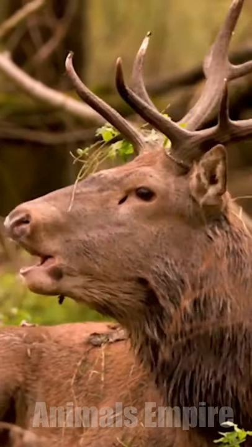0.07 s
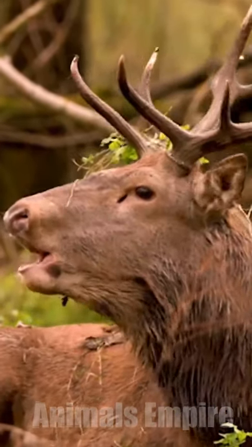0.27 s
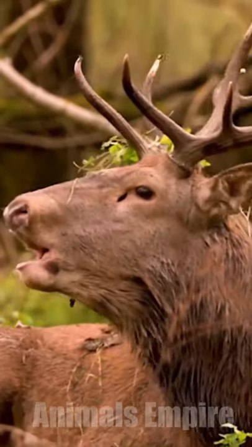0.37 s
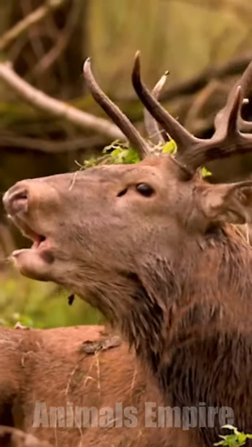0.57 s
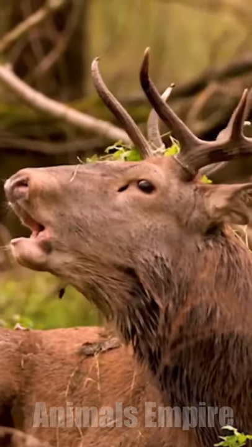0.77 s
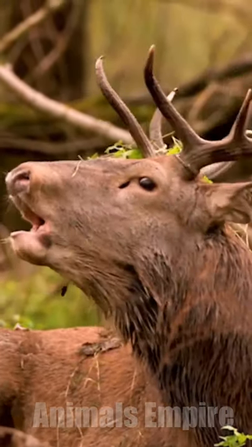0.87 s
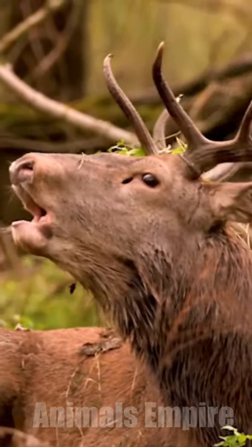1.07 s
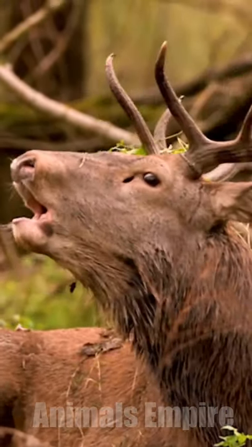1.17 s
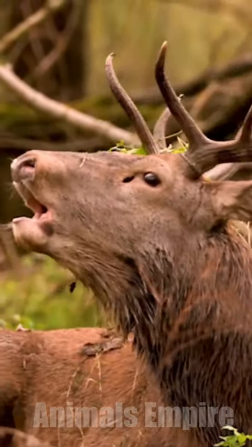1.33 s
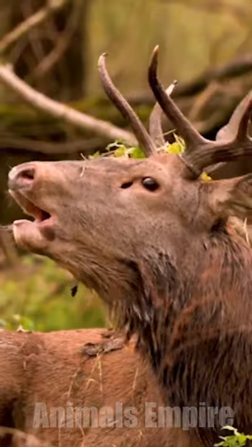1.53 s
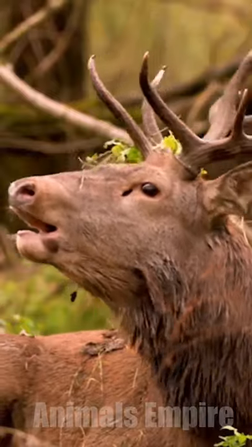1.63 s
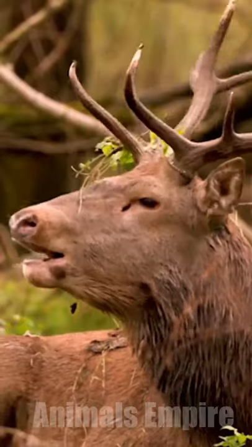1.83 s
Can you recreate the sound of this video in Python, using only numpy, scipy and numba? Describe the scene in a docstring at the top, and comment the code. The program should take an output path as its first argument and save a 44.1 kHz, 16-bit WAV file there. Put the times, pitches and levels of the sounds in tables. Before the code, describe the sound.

One deep stag roar, starting clear, then rattling and sinking, over faint outdoor noise.

```python
"""One long roar from a red deer stag fills a quiet woodland.
It starts as a clear note: the vocal folds snap shut in a steady beat and make the throat ring, and
the ringing sinks as the throat lengthens. The beat turns uneven and the note breaks into a harsh rattle,
then drops in pitch and dies away with a small grunt. The trees return a faint tail."""
import sys
import numpy as np
from scipy import signal
from scipy.fft import rfft, irfft
from scipy.io import wavfile
from scipy.ndimage import uniform_filter1d
from numba import njit

SR = 44100
rng = np.random.default_rng(int(sys.argv[2]) if len(sys.argv) > 2 else 0)


def generate_wav(sig):
    """Save sig (samples, or channels by samples) to the path in sys.argv[1] as 16-bit PCM at SR."""
    pcm = np.round(np.clip(np.atleast_2d(sig).T, -1, 1) * 32767).astype(np.int16)
    wavfile.write(sys.argv[1], SR, pcm)


N = 83790
T = np.arange(N) / SR
ROAR_START_S = 0.146

# How the ringing sinks as the throat lengthens. Each row: time in seconds, factor on its frequencies.
THROAT_SHIFT = [(.15,1.38),(.23,1.26),(.32,1.14),(.44,1.095),(.52,1.035),(.58,1.0),(.7,1.0)]
# Loudness of the voice. Each row: time in seconds, then middle, upper and treble level in relative dB.
VOICE_LEVELS = [(0.13, -55, -50, -67), (0.184, -36, -34, -69), (0.218, -27.5, -29, -66),
                (0.298, -29.5, -22, -59), (0.344, -22, -26.5, -62), (0.456, -26, -17.5, -47),
                (0.532, -19, -16.5, -36), (0.56, -21.5, -21.5, -32.5), (0.59, -20.5, -17, -30),
                (0.704, -22, -23, -39), (1.154, -21.5, -25.5, -40), (1.192, -22, -39, -44),
                (1.208, -19.5, -24.5, -39.5), (1.246, -20, -26.5, -44), (1.34, -24.5, -29.5, -38.5),
                (1.404, -17.5, -28, -38), (1.438, -24, -27, -41), (1.552, -30, -37, -54),
                (1.606, -28.5, -38.5, -57), (1.65, -56, -44, -54)]


def from_db(db):
    """Turn decibels into a factor to multiply by."""
    return 10 ** (np.asarray(db) / 20)


def in_time(rows):
    """Join rows that start with a time by straight lines, giving one curve per further column."""
    times, *columns = np.transpose(rows)
    return [np.interp(T, times, column) for column in columns]


def gate(start_s, end_s, fade_s=0.016):
    """Let sound through between two times, with short fades outside them."""
    return np.clip(1 + np.minimum(T - start_s, end_s - T) / fade_s, 0, 1)


def even(x, size=1500):
    """Hold the level near 1, averaging over stretches of `size` samples."""
    power = uniform_filter1d(uniform_filter1d(x * x, size), size)
    return x / np.sqrt(np.abs(power) + 1e-12)


def band(x, low_hz, high_hz, order=3):
    """Keep the sound between two frequencies."""
    return signal.sosfilt(signal.butter(order, [low_hz, high_hz], "band", fs=SR, output="sos"), x)


def wander(rate_hz):
    """A smooth random wobble with a typical size of 1."""
    x = signal.sosfilt(signal.butter(2, rate_hz, fs=SR, output="sos"), rng.standard_normal(N))
    return x / x.std()


@njit
def resonate(x, pole):
    """One resonance, a tone that rings on; `pole` sets its pitch and decay at each sample."""
    out, state = np.zeros(len(x)), 0j
    for i in range(len(x)):
        state = state * pole[i] + x[i]
        out[i] = state.real
    return out


def airway(x, resonances, shift=0.97):
    """The airway rings at several resonances at once, each at its base frequency times `shift`."""
    out = 0
    for hz, width_hz, db in resonances:
        decay = np.exp(-np.pi * abs(width_hz) / SR)
        pole = decay * np.exp(2j * np.pi * hz * shift / SR) * np.ones(N)
        out = out + from_db(db) * (1 - decay) * resonate(x, pole)
    return out


def clear_to_harsh(clear, harsh, middle_s=0.7045, length_s=0.04075):
    """The voice breaks: a quick fade from its clear sound to its harsh one."""
    broken = np.clip((T - middle_s) / length_s + .5, 0, 1)
    return np.sqrt(1 - broken) * even(clear) + np.sqrt(broken) * even(harsh)


def background():
    """Faint, steady outdoor noise."""
    # The tone of the woodland air. Each row: frequency in Hz, relative level in dB.
    spectrum = [(25,-15),(60,-11),(150,-7.5),(400,-8),(1000,-7),(1700,-16),(3000,-22.5),(7000,-30.5),(14000,-34.5)]
    hz, db = np.transpose(spectrum)
    all_hz = np.arange(N // 2 + 1) * SR / N
    colour = from_db(np.interp(np.log(all_hz + 1), np.log(hz), db))
    noise = irfft(rfft(rng.standard_normal(N)) * colour, N)
    return from_db(-44.5) * noise / noise.std()


def tree_echoes(x, level_db=-17, die_away_s=.9):
    """The trunks scatter the sound back as a dull, fading tail."""
    tail = band(rng.standard_normal(N), 570, 2000, order=1)
    tail *= from_db(-60 * T / die_away_s) * np.minimum(T / 0.0077, 1)
    return from_db(level_db) * signal.fftconvolve(x, tail / np.sqrt(np.sum(tail ** 2)))[:N]


def grunts():
    """Soft puffs of breath pass through the slack throat before and after the roar."""
    # The puffs. Each row: time of the peak in seconds, half length in seconds, level in dB.
    puffs = [(0.024,0.014,-38.5),(1.702,0.019,-37),(1.838,0.091,-52)]
    # Throat resonances. Each row: base frequency in Hz, width in Hz, relative level in dB.
    slack_throat = [(201,30,6.5),(530,124,-7),(876,15,-1.5),(1008,40,-28),(1410,78,-27)]
    level = sum(from_db(db) * np.exp(-((T - s) / half_s) ** 2) for s, half_s, db in puffs)
    breath = airway(rng.standard_normal(N), slack_throat)
    return level * even(band(breath, 150, 2400, order=2))


def wheeze(peak_s=0.37, half_length_s=0.11, peak_db=-47):
    """A thin, breathy whistle sinks as the throat lengthens."""
    # Its resonance. The row: base frequency in Hz, width in Hz, relative level in dB.
    whistle = [(4270,230,0)]
    level = from_db(peak_db) * np.exp(-((T - peak_s) / half_length_s) ** 2)
    return level * even(airway(rng.standard_normal(N), whistle, in_time(THROAT_SHIFT)[0]))


def snaps(decay_s=.0028, boost_db=6.5):
    """The hardest closures of the vocal folds make high cracks."""
    # Each row: start in seconds, relative level in dB.
    closures = [(0.7516, -31.5), (0.925, -30), (1.1204, -28), (1.1675, -31), (1.2984, -32.5), (1.3154, -32),
                (1.3331, -33), (1.3505, -33), (1.3682, -31)]
    level = sum(from_db(db + boost_db) * (T >= s) * np.exp(-np.abs(T - s) / decay_s)
                for s, db in closures)
    crack = level * rng.standard_normal(N)
    return band(crack, 5200, 8000, order=2) + from_db(-16) * band(crack, 7800, 14000)


def last_beats():
    """The folds slacken and end the roar with a few slow, separate thuds."""
    # The closures. Each row: time in seconds, level in dB.
    closures = [(1.604,-25),(1.617,-19),(1.63,-18.5)]
    # What they ring with. Each row: base frequency in Hz, width in Hz, relative level in dB.
    slack_ring = [(221,50,-1.5),(308.8,75.5,-10.5)]
    clicks = np.zeros(N)
    for s, db in closures:
        clicks[int(s * SR)] = from_db(db)
    thuds = band(airway(clicks, slack_ring), 130, 420, order=2)
    return thuds * clicks.max() / np.abs(thuds).max()


def fold_clicks(cycles, roughness, spread_db, spread_s=0.000434):
    """The folds click shut once a cycle; strength and timing stray by the spreads times roughness."""
    times = np.interp(np.arange(1, int(cycles[-1])), cycles, T)
    chance = rng.standard_normal((len(times), 2)) * np.interp(times, T, roughness)[:, None]
    position = np.clip((times + spread_s * chance[:, 0]) * SR, 0, N - 2)
    strength = from_db(spread_db * np.clip(chance[:, 1], -2, 2))
    sample, fraction = position.astype(int), position % 1
    clicks = np.zeros(N)
    np.add.at(clicks, sample, strength * (1 - fraction))  # two neighbouring samples share each click
    np.add.at(clicks, sample + 1, strength * fraction)
    return clicks


def with_air(clicks, air_share, puff_s):
    """Each closure lets through a short puff of rushing air."""
    puff_level = signal.lfilter([1], [1, -np.exp(-1 / (puff_s * SR))], clicks + 1e-18)
    return even(clicks) + air_share * even(puff_level * rng.standard_normal(N))


def growl(pitch_hz):
    """Uneven beats stray around the pitch and ring low in the chest."""
    # Loudness of the growl. Each row: time in seconds, level in dB.
    levels = [(.1,-58),(.17,-38),(.25,-57),(.65,-47),(.68,-31),(.76,-23.5),(.81,-16.5),(.92,-21.5),(.99,-17),(1.05,-21.5),(1.11,-17),(1.2,-23.5),(1.27,-20.5),(1.31,-37),(1.55,-52),(1.63,-48),(1.67,-55)]
    # Chest resonances. Each row: base frequency in Hz, width in Hz, relative level in dB.
    chest = [(178,26,-6),(226.3,47,15.5),(325,210,5)]
    cycles = np.cumsum(pitch_hz * np.clip(1 + .2 * wander(40.3), .3, 2)) / SR
    clicks = fold_clicks(cycles, np.ones(N), spread_db=3.5, spread_s=.0016)
    beats = with_air(clicks, air_share=0.69, puff_s=0.0063)
    rumble = band(airway(beats, chest), 139.7, 379, order=5)
    return from_db(in_time(levels)[0]) * even(rumble, size=900)


def mouth_echoes(x, decay_s=.004):
    """Short reflections in the mouth smear each pulse but keep the pitch."""
    return even(signal.fftconvolve(x, rng.standard_normal(N) * np.exp(-T / decay_s))[:N])


def rasp(cycles, roughness):
    """Airy pulses from the folds give the voice its high, hissing edge."""
    # High resonances of the lengthening throat and of the fully stretched one.
    # Each row: base frequency in Hz, width in Hz, relative level in dB.
    sinking = [(4340,200,-3),(5980,130,7),(6940,170,4.5),(7800,260,-4)]
    stretched = [(3810,660,6.5),(5550,67,9),(6400,3200,-6.5),(8130,680,-5)]
    clicks = fold_clicks(cycles, roughness, spread_db=5)
    hiss = with_air(clicks, air_share=.3 + 3 * roughness, puff_s=.007)
    clear = band(airway(mouth_echoes(hiss), sinking, in_time(THROAT_SHIFT)[0]), 3000, 9200)
    harsh = band(airway(hiss, stretched), 3830, 8640)
    sizzle = from_db(-17.5) * np.sqrt(roughness) * even(band(mouth_echoes(hiss), 9000, 19000))
    _, _, treble_db = in_time(VOICE_LEVELS)
    return from_db(treble_db - 2) * (clear_to_harsh(clear, harsh) + sizzle)


def throat_ring(cycles, roughness):
    """Pulses from the folds ring in the throat, mouth and nose, giving the roar its vowel."""
    # Resonances: mouth, nose and lengthening throat (clear voice), stretched throat (harsh voice),
    # and a low one under both. Each row: base frequency in Hz, width in Hz, relative level in dB.
    mouth = [(998,62,-1.5),(1152.5,30,0)]
    nose = [(3135,68,-7),(1405,67,-13)]
    sinking = [(1357.6,57,5.5),(2000,84,-4),(2664,63,-3),(3120,67,-12.5)]
    stretched = [(889.7,20.5,1.5),(1027,41.3,1),(1120,58,-16.5),(1387,21,3.5),(1468,36,6),(1838,38,-4),(2027,64,-2.5),(2317.5,22,0.5),(2379.5,37,-15),(2994,29,-6.5),(3254,73,-4.5)]
    low_ring = [(481,37,0)]
    # Loudness of the low ring. Each row: time in seconds, level in dB.
    low_levels = [(.15,-59),(.4,-65),(.65,-36),(.8,-27),(1.2,-31),(1.35,-34),(1.5,-37.5),(1.65,-51)]
    clicks = fold_clicks(cycles, roughness, spread_db=4.5)
    pulses = with_air(clicks, air_share=.06 + .55 * roughness, puff_s=.0025)
    shift = in_time(THROAT_SHIFT)[0]
    # The mouth opens around 0.2 seconds and lets out the higher resonances.
    opening = from_db(-11 * np.clip(.5 - (T - .2) / .1, 0, 1))
    higher = airway(pulses, sinking[1:], shift) + airway(pulses, nose)
    clear = airway(pulses, sinking[:1], shift) + opening * higher
    harsh = airway(pulses, stretched)
    low = even(band(airway(pulses, low_ring), 509.4, 659))
    middle = clear_to_harsh(band(airway(pulses, mouth), 677, 1150), band(harsh, 857, 1130))
    upper = clear_to_harsh(band(clear, 1247, 2860), band(harsh, 1297, 3034, order=4))
    low_db = in_time(low_levels)[0]
    middle_db, upper_db, _ = in_time(VOICE_LEVELS)
    return from_db(low_db) * low + from_db(middle_db - 2) * middle + from_db(upper_db + 0.5) * upper


def harmonics(cycles, levels_db):
    """The beating folds make a deep note: pure tones at 1, 2, 3 and 4 times the pitch."""
    # One value per tone: the dB added to its level.
    trim_db = [0.0, 0.0, 0.0, -1.0]
    # In-between tones, heard while every second beat is stronger.
    # Each row: multiple of half the pitch, level in dB.
    half_tones = [(3,-32),(5,-24)]
    note = sum(from_db(db + trim_db[k]) * np.cos(2 * np.pi * (k + 1) * cycles)
               for k, db in enumerate(levels_db))
    halves = sum(from_db(db) * np.cos(np.pi * multiple * cycles) for multiple, db in half_tones)
    return np.sqrt(2) * (note * gate(ROAR_START_S, 1.595) + halves * gate(1.285, 1.425))


def roar():
    """The stag's vocal folds beat at a gliding pitch, which wobbles more as they turn rough."""
    # The clear start, harsh middle and falling end of the call.
    # Each row: time in seconds, pitch in Hz, then the levels of harmonics 1 to 4 in relative dB.
    clear_part = [(0.15, 108.3, -60, -62, -68, -48), (0.178, 124.7, -47, -36.5, -44, -39),
                  (0.202, 138.7, -42, -40, -32, -69), (0.23, 148.7, -40, -31, -33.5, -48),
                  (0.246, 153, -38, -38.5, -34.5, -62), (0.286, 152.8, -35.5, -28, -38, -51),
                  (0.364, 156.1, -31.5, -25.5, -34, -47), (0.402, 153.6, -32, -21.5, -36, -59.5),
                  (0.468, 148.1, -30, -22.5, -32, -29), (0.534, 140, -32.5, -20.5, -29.5, -37.5),
                  (0.608, 138.4, -34.5, -20, -19, -44), (0.66, 138.6, -31.5, -17.5, -22.5, -36)]
    harsh_part = [(0.69, 150.8, -28, -19, -24, -45), (0.7, 150.2, -23.5, -18.5, -18, -44),
                  (0.78, 162, -21.5, -16.5, -24, -38), (0.796, 166.4, -19, -26, -18.5, -37),
                  (0.852, 152.5, -25.5, -21, -22, -41), (0.954, 159.3, -25.5, -14, -18.5, -37),
                  (0.982, 155.2, -27, -19, -20.5, -48), (1.052, 145.1, -25.5, -19.5, -27, -43),
                  (1.108, 157.5, -22.5, -19.5, -31, -48), (1.14, 142.7, -25.5, -18.5, -25.5, -49),
                  (1.238, 131.1, -26, -20.5, -36.5, -35), (1.26, 127.2, -26.5, -29, -31.5, -31)]
    falling_part = [(1.295, 117.0, -29.5, -25, -18, -27), (1.421, 111.3, -34, -36, -18, -30),
                    (1.459, 108.9, -37, -24.5, -15.5, -31), (1.501, 107.8, -36, -25, -20.5, -35),
                    (1.587, 99.57, -38, -26.5, -27.5, -39), (1.6, 97.7, -36, -26, -22, -28)]
    # How unevenly the folds beat. Each row: time in seconds, roughness from 0 to 1.
    unevenness = [(.14,.7),(.21,.25),(.27,.02),(.64,.02),(.70,.3),(.80,.6),(1.0,.6),(1.12,.95),(1.25,.8),(1.31,.35),(1.45,.3),(1.5,.17),(1.58,.17),(1.64,.8)]
    pitch_hz, *levels_db = in_time(list(clear_part) + list(harsh_part) + list(falling_part))
    roughness = in_time(unevenness)[0]
    cycles = np.cumsum(pitch_hz * (1 + 0.0353 * roughness * wander(32))) / SR  # beats so far
    ringing = gate(ROAR_START_S, 1.635) * (throat_ring(cycles, roughness) + rasp(cycles, roughness))
    return harmonics(cycles, levels_db) + ringing + growl(pitch_hz) + wheeze()


def scene():
    """The stag among the trees, in one channel."""
    stag = roar() + last_beats() + snaps() + grunts()
    return (stag + tree_echoes(stag) + background())[None, :]


def record(dry, ceiling=0.47, cutoff_hz=13900):
    """Round off the loudest peaks and cut the highest treble."""
    rounded = ceiling * np.tanh(dry / ceiling)
    return signal.sosfilt(signal.ellip(10, .1, 80, cutoff_hz, fs=SR, output="sos"), rounded)


dry = scene()
out = record(dry)
generate_wav(out)
```